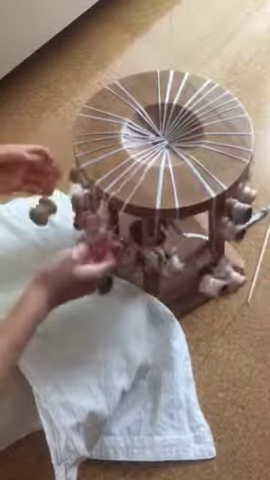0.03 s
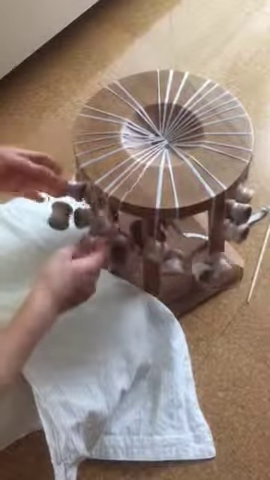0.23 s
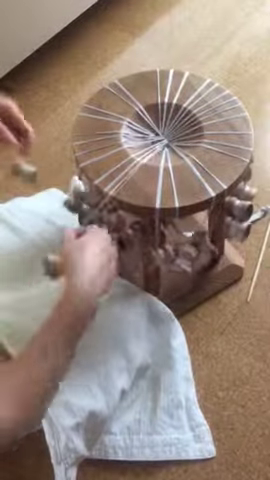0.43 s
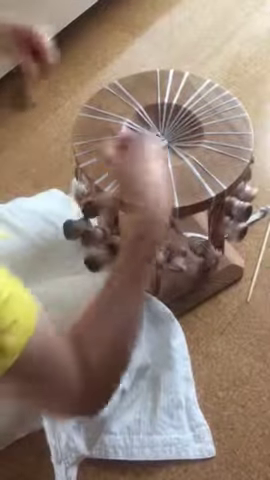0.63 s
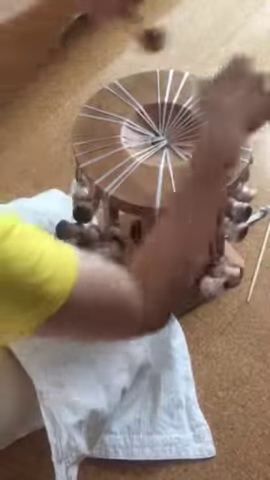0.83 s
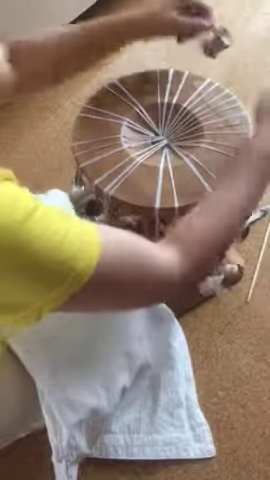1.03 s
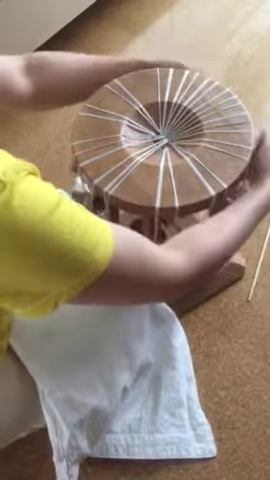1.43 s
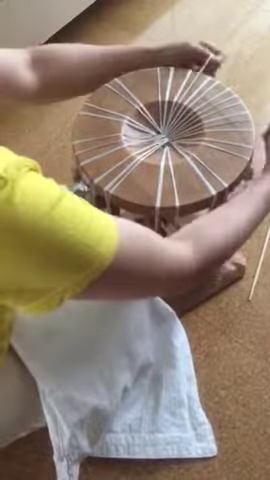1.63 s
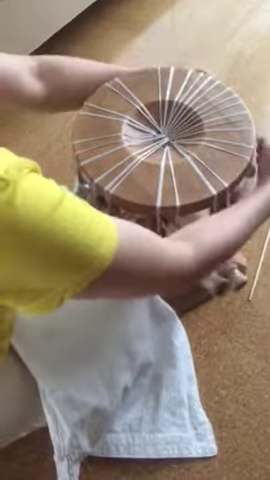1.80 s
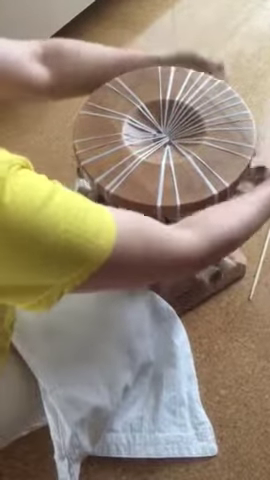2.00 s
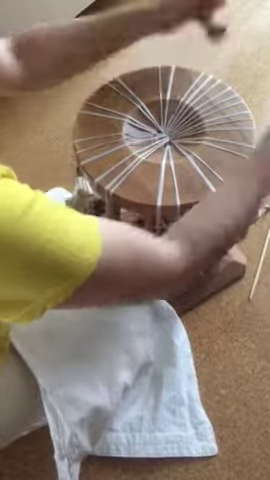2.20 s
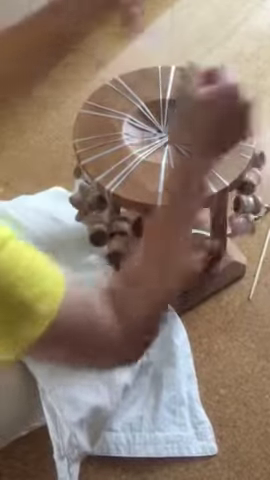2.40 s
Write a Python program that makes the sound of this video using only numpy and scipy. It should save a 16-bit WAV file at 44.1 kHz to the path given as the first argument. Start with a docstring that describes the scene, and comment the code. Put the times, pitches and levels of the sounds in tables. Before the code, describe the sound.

Light, irregular clicks of wooden bobbins, with a few hollow knocks against a wooden stand.

```python
"""Weighted wooden bobbins click together on their threads as they are moved round a braiding stand.
Each click is a hard contact that rings a bobbin's modes. Three times one is let go and knocks on the
wooden stand, which thuds and rings; a few lighter bumps fall around these. Hands, threads and bobbins
rub faintly. A low mains hum and the soft noise of a quiet room lie underneath."""
import sys
import numpy as np
from scipy import signal
from scipy.fft import rfft, irfft
from scipy.io import wavfile

SR = 44100
rng = np.random.default_rng(int(sys.argv[2]) if len(sys.argv) > 2 else 0)


def to_wav(s):
    """Save 16-bit WAV."""
    ch = np.atleast_2d(s).T  # columns
    pcm = np.round(np.clip(ch, -1, 1) * 32767)  # PCM
    wavfile.write(sys.argv[1], SR, pcm.astype(np.int16))


N = 112454
TIME_S = np.arange(N) / SR


def from_db(db):
    """Decibels to gain."""
    return 10 ** (np.asarray(db) / 20)


def unit_rms(x):
    """Scale to rms 1."""
    return x / np.sqrt(np.mean(x ** 2) + 1e-20)


def at_hz(points, hz, column=1):
    """Interpolate a table column over log frequency."""
    table = np.array(points)
    return np.interp(np.log(hz + 1e-9), np.log(table[:, 0]), table[:, column])


def coloured(x, spectrum):
    """Shape x by rows of (Hz, dB); rms 1."""
    bins_hz = np.arange(N // 2 + 1) * SR / N
    return unit_rms(irfft(rfft(x) * from_db(at_hz(spectrum, bins_hz)), N))


def add(out, start_s, sound):
    """Mix a sound in at start_s."""
    i = max(int(start_s * SR), 0)
    out[i:i + len(sound)] += sound[:max(N - i, 0)]


def mode(t, hz, t60_s):
    """Decaying sine, envelope from 1."""
    return np.sin(2 * np.pi * hz * t) * from_db(-60 * t / max(t60_s, 1e-3))


def low_cut(x, hz):
    """High-pass: small bodies radiate little bass."""
    return signal.sosfilt(signal.butter(2, hz, "high", fs=SR, output="sos"), x)


def room_noise():
    """Steady noise, mostly bass."""
    # Noise spectrum. Each row: frequency in Hz, relative density in dB.
    spectrum = [(25, -37), (52, -14), (74, 0), (95, -9), (135, -4.5), (170, -8.5), (240, -18.5), (430, -25),
                (680, -22.5), (900, -18.5), (1400, -28.5), (2600, -39), (4200, -43.5), (15000, -49.5)]
    return from_db(-56.5) * coloured(rng.standard_normal(N), spectrum)


def mains_hum():
    """One low sine whose level wavers."""
    hum_hz, rms_db, waver_db = 120.2, -56, 3.1
    waver = np.interp(TIME_S, np.linspace(0, N / SR, 20), rng.standard_normal(20))
    return np.sqrt(2) * np.sin(2 * np.pi * hum_hz * TIME_S) * from_db(rms_db + waver_db * waver)


def handling_rub():
    """Hands, threads and bobbins rub: a stream of tiny catches of uneven size."""
    # Rub envelope. Each row: time in seconds, level in dB.
    envelope = [(0, -76.5), (.21, -78.5), (.26, -51.5), (.36, -69.5), (.5, -71), (1.3, -83.5),
                (1.38, -50.5), (1.46, -68.5), (1.6, -59.5), (1.74, -75), (1.87, -64), (1.97, -47.5),
                (2.07, -69), (2.13, -54), (2.3, -71.5), (2.4, -67.5), (2.55, -75)]
    # Rub spectrum. Each row: frequency in Hz, relative density in dB.
    spectrum = [(300, -20), (1100, -8), (2400, 1.5), (3700, -7), (4900, -17.5), (6700, -14), (9000, -27),
                (15000, -49.5)]
    catches_per_s = 5500
    catches = rng.standard_normal(N) * (rng.random(N) < catches_per_s / SR)
    level_db = np.interp(TIME_S, *np.transpose(envelope))
    return from_db(level_db) * coloured(catches, spectrum)


def bobbin_clicks():
    """Bobbin hits bobbin: a hard contact with brief chatter rings three groups of modes."""
    # Collisions. Each row: start in seconds, relative level in dB, pitch in Hz, hollow body gain in dB,
    # bright edge gain in dB, edge pitch in Hz, room send in dB.
    clicks = [(.181, -53, 2480, -6, -0.5, 6300, -3.5), (0.229, -54, 2470, 2.5, 1.5, 6140, -6),
              (0.2409, -38, 2120, -7.5, -6, 7400, -8.5), (.2416, -37, 2965, -14, -11.5, 6860, -9.5),
              (0.2751, -44, 2770, -5, -8.5, 6580, -5.5), (.309, -47.5, 2130, -3.5, -9, 7380, -5.5),
              (.4395, -44.5, 2200, -5, -9, 6220, 0), (0.4729, -43, 1540, 1.5, -11, 7170, -4.5),
              (.570, -61.5, 2760, -17, -5.5, 6740, -10), (0.7343, -54, 2275, -2.5, -18, 6500, -7),
              (0.843, -51.5, 2150, -8, -17, 6000, -7.5), (1.3579, -41.5, 2410, -7.5, -16, 6300, -3.5),
              (1.369, -44, 1944, -14, -11.5, 6800, -15), (1.379, -62, 2480, 5, -6, 6500, 5.5),
              (1.388, -57, 2360, -22, 0.5, 6440, -2.5), (1.447, -54.5, 2200, 4, -11.5, 6170, -4),
              (1.504, -59, 2730, 4.5, -11.5, 6440, -0.5), (1.539, -55, 2250, -1.5, -18, 6740, 1.5),
              (1.561, -44.5, 3175, -16, -13.5, 7100, -6.5), (1.601, -68.5, 2400, 0, -1.5, 6470, 10),
              (1.614, -63, 2370, 4.5, -4, 7200, -1.5), (1.6553, -56, 1940, -0.5, -21, 6560, -1),
              (1.7977, -42.5, 2254, -11.5, -21.5, 6800, -4.5), (1.804, -56.5, 2590, -6, -9, 6800, 1.5),
              (1.841, -61, 2310, 0.5, -0.5, 7400, 2.5), (1.881, -48.5, 2270, 2.5, 2.5, 6570, -3),
              (1.934, -40, 2607, -6.5, -5.5, 7200, -6), (1.988, -52, 2080, 6.5, -3, 6200, 2.5),
              (2.038, -56, 2340, -0.5, -7, 6640, -2.5), (2.110, -44, 1990, 1.5, -16, 6400, -5),
              (2.137, -52, 1980, -4, -4, 6800, -6), (2.213, -52, 1710, 2.5, -16, 6350, -5),
              (2.248, -62, 2000, 4, -5.5, 6740, 2), (2.349, -57, 2220, 2.5, -11, 5720, 3),
              (2.402, -53, 1950, 2, -18, 6600, -2), (2.514, -58, 2110, 3, -18, 6440, -1.5)]
    # Main modes. Each row: ratio to the pitch, relative level in dB, t60 in seconds.
    main_modes = [(.85, -5.5, 0.011), (1.0, -5, 0.021), (1.17, -7, 0.011)]
    # Hollow body modes. Each row: frequency in Hz, relative level in dB, t60 in seconds.
    body_modes = [(907, 5, 0.0087), (1380, 0.6, 0.0053)]
    # Bright edge modes. Each row: ratio to the edge pitch, relative level in dB, t60 in seconds.
    edge_modes = [(.6, -5.5, 0.0045), (.88, -1.5, 0.0046), (1.02, -3, 0.0082), (1.2, -2.5, 0.0028),
                  (1.5, -9, 0.0019), (1.85, -7.5, 0.0017)]
    chatter_s, chatter_db, trim_db = 0.0013, 8.5, -2.5
    swell_cycles, scatter_db = 0.79, 2.5
    t, direct, send = TIME_S[:SR // 30], np.zeros(N), np.zeros(N)
    for start_s, level_db, pitch_hz, body_db, edge_db, edge_hz, send_db in clicks:
        contact = rng.standard_normal(len(t)) * np.sqrt(t) * np.exp(-t / chatter_s)
        contact *= from_db(chatter_db) / np.linalg.norm(contact)
        contact[0] += 1  # first impact
        groups = (main_modes, pitch_hz, 0), (body_modes, 1, body_db), (edge_modes, edge_hz, edge_db)
        click = 0
        for modes, scale, group_db in groups:
            ring = 0
            for k, (tuning, mode_db, t60_s) in enumerate(modes):
                hz = tuning * scale
                gain = from_db(mode_db + scatter_db * rng.standard_normal())  # varies per blow
                swell = 1 - np.exp(-t * hz / swell_cycles)
                ring = ring + (-1) ** k * gain * swell * mode(t, hz, t60_s)
            struck = unit_rms(signal.fftconvolve(contact, ring)[:len(t)])
            click = click + from_db(trim_db + level_db + group_db) * struck / 2
        add(direct, start_s, click)
        add(send, start_s, click * from_db(send_db))
    return low_cut(direct + room_tail(send), hz=890)


def room_tail(x):
    """Diffuse reverb: half-octave noise bands, each decaying at its own rate."""
    # Room response. Each row: frequency in Hz, gain in dB, t60 in seconds.
    response = [(122, -8.5, 1), (304, 8, 0.23), (670, 12.5, 0.2), (1400, -3.5, 0.3), (2600, 3, 0.2),
                (6950, -0.5, 0.19), (14000, 1, 0.13)]
    delay_s, build_s = 0.001, 0.0059
    t, tail = TIME_S[:SR // 2], 0
    onset = np.clip((t - delay_s) / build_s, 0, 1)
    edges_hz = 60 * 2 ** (np.arange(17) / 2)
    for low_hz, high_hz in zip(edges_hz, edges_hz[1:]):
        centre_hz = np.sqrt(low_hz * high_hz)
        bandpass = signal.butter(2, [low_hz, high_hz], "band", fs=SR, output="sos")
        decay = from_db(-60 * t / at_hz(response, centre_hz, column=2))
        band = signal.sosfilt(bandpass, rng.standard_normal(len(t))) * decay * onset
        band *= np.sqrt(2 * (high_hz - low_hz) / SR / np.sum(band ** 2))  # unity gain in band
        tail = tail + band * from_db(at_hz(response, centre_hz))
    return signal.fftconvolve(x, tail)[:N]


def stand_knocks():
    """Bobbin hits stand: a heavy, soft contact thuds for a few cycles and rings frame and room."""
    # Blows. Each row: start in seconds, envelope peak in dB, thud pitch in Hz, rise in cycles,
    # send to frame and room in dB.
    knocks = [(0.323, -47, 330, 0.49, 7), (.4575, -23.5, 740, 1.68, -11), (0.4674, -19, 707, 1.26, -5),
              (.4705, -34.5, 257, 0.34, 9), (1.457, -34.5, 510, 0.53, -9), (1.4625, -33, 270, 0.575, 12),
              (1.462, -39, 141, 0.97, 18.5), (1.483, -42, 365, .7, -3), (1.503, -40.5, 618, 1.6, -19),
              (1.638, -48.5, 288, 0.81, 4), (2.0125, -28, 670, 1.24, -6.5), (2.0225, -35.5, 278, 0.67, 9),
              (2.037, -41, 426, 0.84, 9), (2.522, -46.5, 175, 1.6, -6)]
    # Frame mode frequencies in Hz.
    frame_hz = [165, 222, 273, 411, 506, 645, 738, 847, 970, 1521, 1593]
    # Frame modes, same order. Each row: relative level in dB, t60 in seconds.
    frame_modes = [(-27, 0.5), (-26, 0.34), (-19, 0.2), (-6, 0.23), (-8.5, 0.31), (-12, 0.33),
                   (-11.5, 0.51), (-7.5, 0.38), (-22, 0.16), (7.5, .14), (-1, 0.31)]
    frame_db, room_db = -3, -12.5
    t = TIME_S[:SR // 15]
    thuds, send, drive = np.zeros((3, N))
    for start_s, peak_db, pitch_hz, rise_cycles, send_db in knocks:
        rise_s = rise_cycles / pitch_hz
        age = t / rise_s
        envelope = from_db(peak_db) * age ** 2 * np.exp(2 * (1 - age))
        thud = envelope * np.sin(2 * np.pi * pitch_hz * t)
        add(thuds, start_s, thud)
        add(send, start_s, thud * from_db(send_db))
        push = (t * pitch_hz) ** 2 * np.exp(-2 * np.pi * pitch_hz * t)
        add(drive, start_s + rise_s, from_db(peak_db + send_db) * push / push.sum())
    frame = sum(from_db(db) * mode(TIME_S[:SR // 2], hz, t60_s)
                for hz, (db, t60_s) in zip(frame_hz, frame_modes))
    ring = from_db(frame_db) * signal.fftconvolve(drive, frame)[:N]
    return low_cut(thuds + ring + from_db(room_db) * room_tail(send), hz=60)


def scene():
    """Mono mix, heard from just above the stand."""
    return (bobbin_clicks() + stand_knocks() + handling_rub() + mains_hum() + room_noise())[None]


def record(dry):
    """Steep low-pass."""
    cutoff_hz = 15400
    return signal.sosfilt(signal.ellip(10, 0.2, 70, cutoff_hz, fs=SR, output="sos"), dry)


dry = scene()
out = record(dry)
to_wav(out)
```